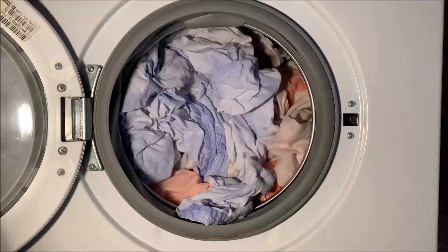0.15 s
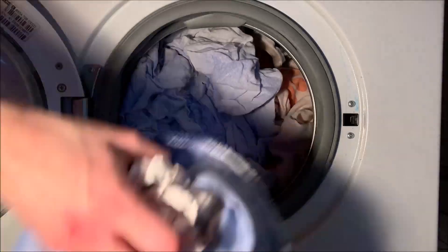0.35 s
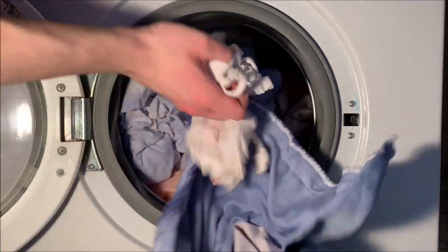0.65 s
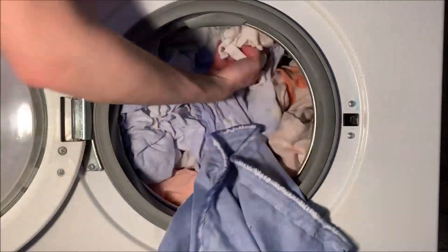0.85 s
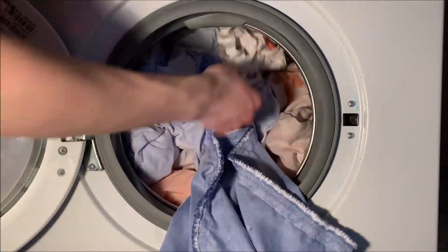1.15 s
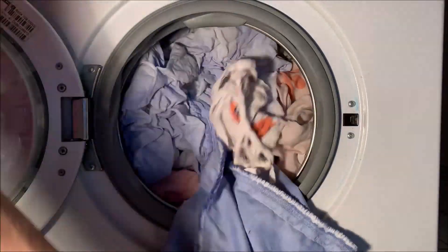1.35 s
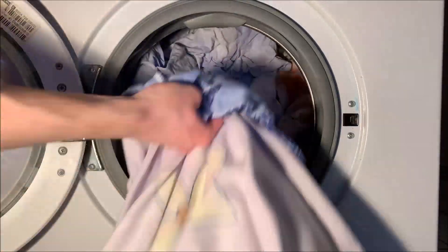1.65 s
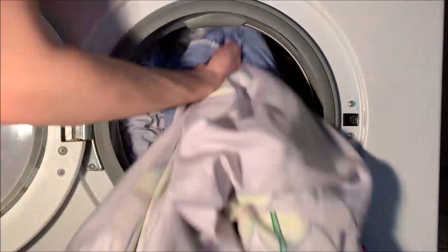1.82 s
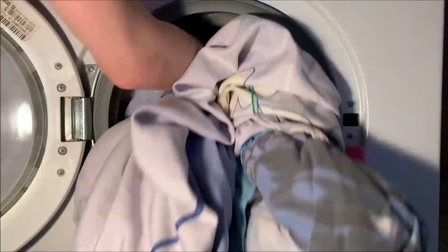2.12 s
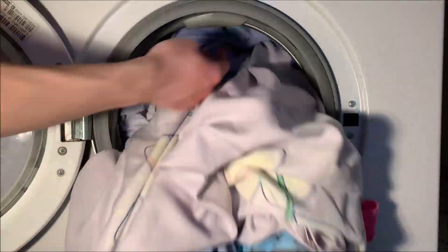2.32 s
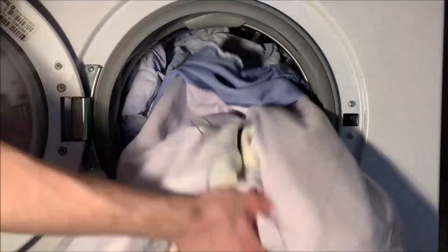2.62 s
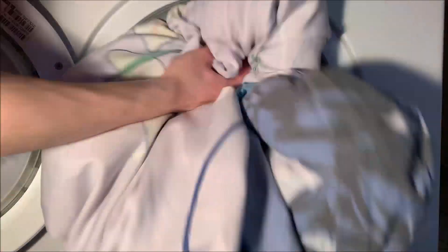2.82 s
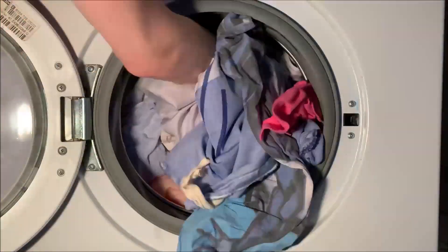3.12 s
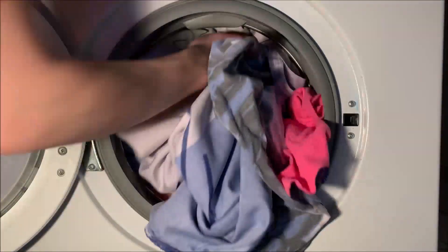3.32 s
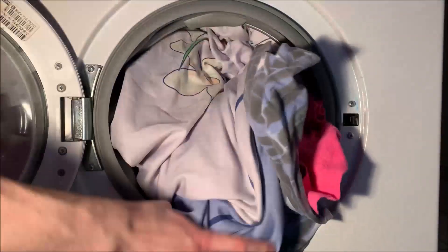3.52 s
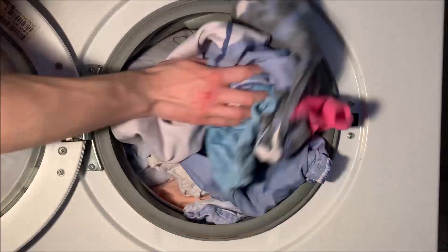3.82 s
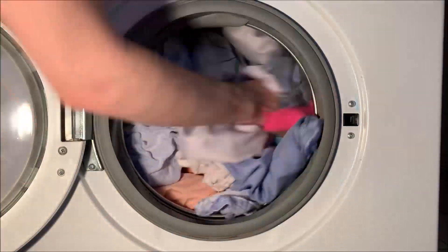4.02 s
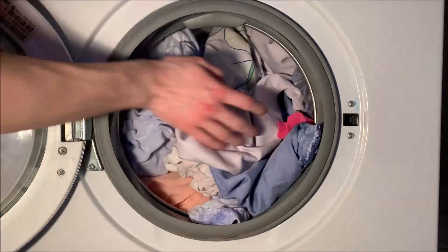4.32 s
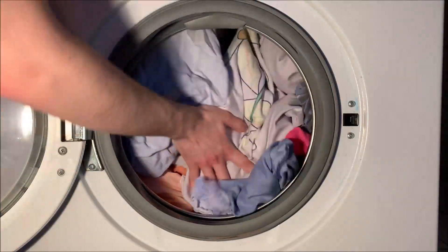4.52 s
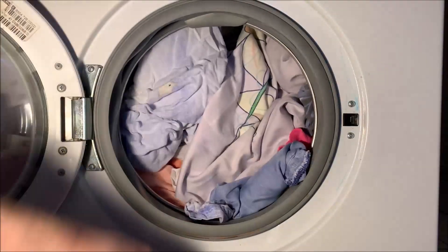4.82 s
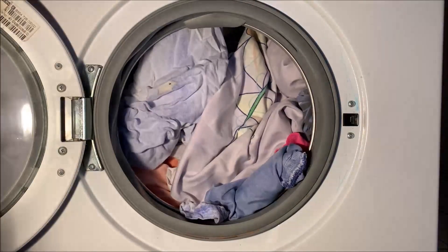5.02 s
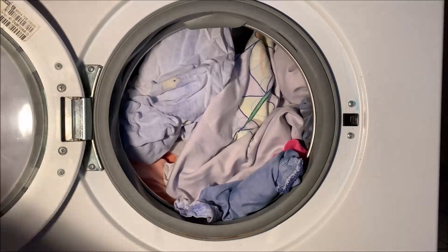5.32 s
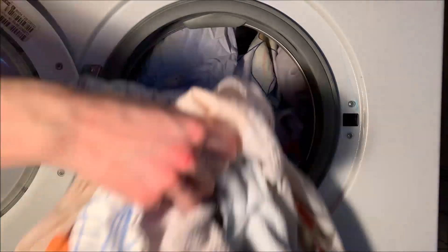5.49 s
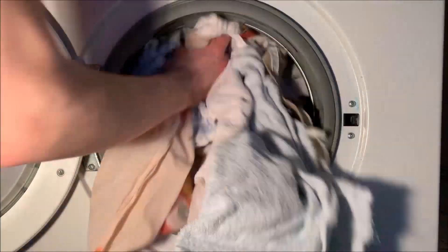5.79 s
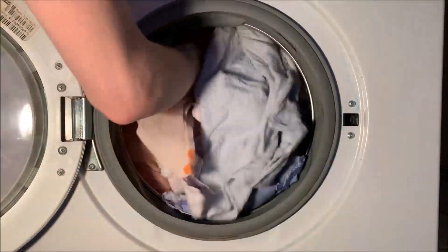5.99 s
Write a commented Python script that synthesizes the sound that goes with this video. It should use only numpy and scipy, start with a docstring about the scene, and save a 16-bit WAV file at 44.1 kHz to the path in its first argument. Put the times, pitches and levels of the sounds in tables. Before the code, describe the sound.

A close stereo perspective just before the open door of a washing machine, in a small hard room with a faint low background. From 0 to 1 s, light cloth swishes come in short strokes, with a soft thud near 0.3 and a low double bump near 0.8. After a brief lull, bumps at 1.4 to 1.5 lead into stronger rustling, dull rubbing on the seal and drum rumble around 1.6 to 2. At about 2.34 a hard, loud knock strikes the metal, with a quick clatter and short hollow ring. Dense rubbing and tumbling continue to 3.1, with thumps near 2.6 and 2.95. A pause, then low bumps and ticks at 3.65 to 3.75 and rustling to 4. Sparse, gentle strokes and faint taps follow until 5.6. A vigorous rubbing shove with deep thumps and a crisp tick closes at 5.8 to 6.

```python
"""Loading a washing machine

Armfuls of laundry are pushed into a front-loading washing machine, heard from just before its door.
Cloth slides over cloth and the door seal: coloured noise of tiny slips, swelling with each hand stroke.
The load bumps the hollow drum and something hard knocks it: decaying modes; noise resonances rumble below.
Taut cloth judders and buttons tick: short filtered bursts. A small room answers all but the cloth and rumble."""
import sys
import numpy as np
from scipy import signal
from scipy.fft import rfft, irfft
from scipy.io import wavfile
from scipy.ndimage import uniform_filter1d

SR = 44100
rng = np.random.default_rng(int(sys.argv[2]) if len(sys.argv) > 2 else 0)


def unload_wav(signal):
    """Save mono or channel-first audio to the path in sys.argv[1] as 16-bit WAV at rate SR, clipped to [-1, 1]."""
    wavfile.write(
        sys.argv[1],
        SR,
        np.round(np.clip(np.atleast_2d(signal).T, -1, 1) * 32767).astype(np.int16),
    )


N = 271215   # length in samples
T = np.arange(N) / SR   # seconds
HZ = np.maximum(np.fft.rfftfreq(2 * N, 1 / SR), 1)   # bins of a double-length spectrum


def from_db(db):
    """Decibels to gain."""
    return 10 ** (np.asarray(db) / 20)


def rms_one(x):
    """Scale to unit rms."""
    return x / np.sqrt(np.mean(x ** 2) + 1e-20)


def at_hz(points, hz):
    """Read a table on a log-frequency axis."""
    f, value = np.transpose(points)
    return np.interp(np.log(hz), np.log(f), value)


def drift(rate):
    """Random curve of rms 1: `rate` chance values a second joined by straight lines."""
    knots = rng.standard_normal(4096)
    return rms_one(np.interp(T * rate, np.arange(len(knots)), knots))


def band(x, hz, octaves):
    """Causal band-pass around hz."""
    edges = np.clip([hz / 2 ** (octaves / 2), hz * 2 ** (octaves / 2)], 10, .48 * SR)
    return signal.sosfilt(signal.butter(2, edges, "band", fs=SR, output="sos"), x)


# likeness of left and right in the sound field: pitch_hz [Hz], correlation [-1 to 1]
LIKENESS = [(60, .975), (130, .93), (300, .85), (640, .45), (1400, .3), (2500, -.25), (6000, -.1)]


def spread(pair, hz):
    """Two unrelated signals become left and right, as alike as the sound field is at hz."""
    alike = np.clip(at_hz(LIKENESS, hz), -.99, .99)
    middle = np.sqrt((1 + alike) / 2) * pair[0]
    side = np.sqrt((1 - alike) / 2) * pair[1]
    return middle + side * [[1], [-1]]


def half_octaves(draws):
    """Stereo half-octave bands (Hz, signal); neighbours come from different draws."""
    centres = 32 * 2 ** np.arange(0, 9.1, .5)
    return [(hz, spread(band(draws[k % 2], hz, 0.46), hz)) for k, hz in enumerate(centres)]


def coloured(draws, colour, patchy_db):
    """Give an excitation a spectrum whose bands flicker a little; rms 1."""
    patchy = sum(x * from_db(patchy_db * drift(35)) for hz, x in half_octaves(draws))
    spectrum = rfft(patchy, 2 * N) * from_db(at_hz(colour, HZ))
    return rms_one(irfft(spectrum)[:, :N])


def slips(per_s, size_db):
    """Tiny stick-slip releases at random moments and of uneven size, in two pairs of draws."""
    born = rng.random(N) < per_s / SR
    sizes = from_db(size_db * np.minimum(rng.exponential(1, N), 5))
    return rms_one(born * sizes * rng.standard_normal((2, 2, N))) + 1e-18


def add(out, s, sound):
    """Mix a short sound in at time s."""
    i = round(s * SR)
    out[:, i:i + sound.shape[1]] += sound[:, :N - i]


def swells(starts, holds, levels_db, rise_db_per_s, fall_db_per_s):
    """Gain of a run of movements that each rise, hold and fall away; the strongest leads."""
    t = T[::40, None]
    early = np.maximum(starts - t, 0)
    late = np.maximum(t - starts - holds, 0)
    db = np.max(levels_db - rise_db_per_s * early - fall_db_per_s * late, axis=1)
    return from_db(np.interp(T, t[:, 0], db))


def cavity(x, echo_db, longest_s, count=10):
    """Early echoes off the drum wall and the glass door comb the sound finely."""
    lags = (rng.uniform(.1, 1, (2, count)) * longest_s * SR).astype(int)
    echoes = np.zeros_like(x)
    for side in range(2):
        for k, lag in enumerate(lags[side]):
            echoes[side] += (-1) ** k * np.roll(x[side], lag)
    return rms_one(x + from_db(echo_db) * echoes)


# quiet of the room, relative spectrum: pitch_hz [Hz], density_db [dB per Hz]
FLOOR_COLOUR = [(25, -12), (65, 4.5), (150, -5), (300, -10), (700, -17), (1300, -15.5), (2000, -28.5),
                (5000, -33), (16000, -31.5)]


def room_floor():
    """Steady coloured noise stands for the quiet of the room."""
    return from_db(-67.5) * coloured(rng.standard_normal((2, 2, N)), FLOOR_COLOUR, patchy_db=1.1)


STROKE_RISE_DB_PER_S, STROKE_FALL_DB_PER_S = 237.5, 130
# hand strokes dragging cloth along, levels before the trims of each layer: start_s [s], hold_s [s],
# swish_db [dB], sheen_db of the finest fibres [dB against the swish], rub_db on seal and drum [dB]
STROKES = [(0.014, 0.15, -72, -3.5, -61.5), (0.264, 0.17, -67.5, -6.5, -62.5), (0.5, 0.055, -60, -1, -60.5),
           (0.624, 0.088, -62, -2, -58.5), (0.764, 0.068, -61, -5.5, -58), (0.955, 0.04, -74, 2, -69.5),
           (1.398, 0.22, -65.5, -5.5, -57.5), (1.603, 0.04, -59.5, -8, -50.5),
           (1.673, 0.14, -64.5, -9, -56), (1.858, 0.049, -58, -3.5, -53.5),
           (1.982, 0.031, -59.5, -9, -51.5), (2.2, 0.07, -85, 5, -64), (2.32, 0.02, -65.5, -6, -55),
           (2.444, 0.076, -64.5, -2.5, -54.5), (2.543, 0.23, -62, -4, -52.5),
           (2.616, 0.043, -58, -5, -47.5), (2.824, 0.056, -67.5, -4, -56.5), (2.924, 0.06, -59, -7.5, -49),
           (3.052, 0.054, -62, -3, -53), (3.25, 0.14, -77.5, -0.5, -65), (3.438, 0.094, -59.5, 3, -61),
           (3.666, 0.083, -64, -1.5, -51.5), (3.788, 0.12, -65.5, -4, -59), (3.931, 0.12, -60.5, -6.5, -56),
           (4.242, 0.062, -68, -4.5, -68.5), (4.393, 0.048, -67.5, -2.5, -65.5),
           (4.525, 0.042, -68, 0, -62), (4.735, 0.037, -74, -1, -69), (5.093, 0.083, -78, 4, -65.5),
           (5.198, 0.16, -69.5, -7.5, -63.5), (5.399, 0.088, -68, -1, -60.5), (5.54, 0.17, -76.5, 0, -63),
           (5.773, 0.12, -62, -6, -54), (5.873, 0.071, -57, 0.5, -48.5)]


def strokes():
    """Strength of the swish, its sheen and the rub as each hand stroke gathers speed, holds and slows."""
    starts, holds, swish_db, sheen_db, rub_db = np.transpose(STROKES)
    return [swells(starts, holds, db, STROKE_RISE_DB_PER_S, STROKE_FALL_DB_PER_S)
            for db in (swish_db, swish_db + sheen_db, rub_db)]


# cloth on cloth, relative spectrum: pitch_hz [Hz], density_db [dB per Hz]
SWISH_COLOUR = [(700, -29), (1500, 1.5), (2600, 3), (3600, 0), (5500, -3), (7500, -2.5), (8800, 5),
                (10500, 1.5), (13500, 0), (16000, 2.5)]


def cloth_swish(swish, sheen, grip_db, creases):
    """Fibres catch and let go: dense tiny slips make a bright hiss, its top octave moving on its own."""
    snaps = slips(per_s=220, size_db=1.0)   # stiff threads snap past each other
    crackle = slips(per_s=12000, size_db=1.0) + from_db(-10.5) * snaps
    fibres = cavity(coloured(crackle, SWISH_COLOUR, patchy_db=1.67), echo_db=-11.5, longest_s=0.013)
    fine = signal.sosfiltfilt(signal.butter(4, 8000, "high", fs=SR, output="sos"), fibres)
    body = swish * rms_one(fibres - fine) * from_db(0.5)
    top = sheen * rms_one(fine) * from_db(1.0 + 1.2 * drift(12))
    return (body + top) * from_db(grip_db + 0.35 * creases)


# cloth on the door seal, relative spectrum: pitch_hz [Hz], density_db [dB per Hz]
RUB_COLOUR = [(200, -17), (400, -3.5), (560, 0), (700, -5), (820, -3.5), (1050, -5.5), (1300, -6),
              (1580, -10.5), (1850, -21.5), (3500, -23), (7000, -34.5)]


def seal_rub(rub, grip_db, creases):
    """Coarser, sparser slips of cloth on the seal make a duller friction."""
    snags = from_db(-11) * slips(per_s=170, size_db=2.5)   # seams and folds let go one by one
    friction = slips(per_s=6000, size_db=3.0) + snags
    seal = cavity(coloured(friction, RUB_COLOUR, patchy_db=2.47), echo_db=-17.5, longest_s=.025)
    return rub * seal * from_db(2.0 + grip_db + 1.1 * creases)


SHOVE_RISE_DB_PER_S, SHOVE_FALL_DB_PER_S = 402.5, 131
SWAY_FROM_RUB_DB, FOLDS_FROM_RUB_DB = -0.5, 5   # any rubbing stirs the load: levels against the rub
# shoves that pack the load in, levels before the rumble trims:
# start_s [s], hold_s [s], sway_db of the drum [dB], folds_db of the tumbling cloth [dB]
SHOVES = [(0.328, 0.011, -46, -56.5), (0.66, 0.064, -43.5, -63), (0.781, 0.045, -40, -45),
          (1.452, 0.02, -52, -43.5), (1.6, 0.13, -49.5, -49), (1.866, 0.071, -42, -44),
          (2.07, 0.015, -41.5, -45), (2.312, 0.025, -35.5, -41.5), (2.569, 0.03, -36, -42.5),
          (2.627, 0.0089, -34.5, -34.5), (2.817, 0.043, -38.5, -42.5), (2.956, 0.034, -38, -31),
          (3.044, 0.047, -47, -37.5), (3.293, 0.31, -51.5, -61), (3.497, 0.039, -47, -48),
          (3.658, 0.12, -34.5, -38.5), (3.88, 0.037, -40.5, -47.5), (3.99, 0.12, -40, -46.5),
          (4.432, 0.019, -49, -56), (4.538, 0.073, -42, -50.5), (4.701, 0.095, -55.5, -56.5),
          (4.935, 0.029, -60.5, -47), (5.44, 0.11, -55.5, -53.5), (5.64, 0.16, -54, -48.5),
          (5.816, 0.017, -33.5, -40), (5.903, 0.051, -28.5, -35)]


def shoves(rub):
    """Strength of the drum's sway and of the tumbling folds: the shoves, and a share of all rubbing."""
    starts, holds, sway_db, folds_db = np.transpose(SHOVES)
    return [np.hypot(swells(starts, holds, db, SHOVE_RISE_DB_PER_S, SHOVE_FALL_DB_PER_S),
                     rub * from_db(share_db))
            for db, share_db in ((sway_db, SWAY_FROM_RUB_DB), (folds_db, FOLDS_FROM_RUB_DB))]


def stirred(modes, evenness):
    """Soft irregular pushes keep low resonances sounding; rms 1, partly levelled by evenness (0 to 1)."""
    out = 0
    for hz, width_hz, db in modes:
        b, a = signal.iirpeak(hz, hz / width_hz, SR)
        pushes = band(rng.standard_normal((2, N)), hz, 1.7)
        out = out + from_db(db) * spread(signal.lfilter(b, a, pushes), hz)
    power = uniform_filter1d(np.mean(out ** 2, axis=0), size=2600)
    return rms_one(out / (power + 1e-12) ** (evenness / 2))


# drum resonances stirred by the soft load: pitch_hz [Hz], width_hz [Hz], level_db [dB, relative]
SWAY_MODES = [(53, 26, -15), (74.5, 6.7, -0.5)]
# resonances stirred by the tumbling folds: pitch_hz [Hz], width_hz [Hz], level_db [dB, relative]
FOLD_MODES = [(122, 140, -1.5), (149, 18, 3.5), (215.5, 110, -10.5), (317, 62, -8.5), (378.7, 25, -11.5)]


def load_rumble(sway, folds):
    """Noise-driven low resonances: the drum sways under the load and the folds tumble."""
    drum = sway * from_db(-2.5) * stirred(SWAY_MODES, evenness=0.79)
    tumble = folds * from_db(-2.0) * stirred(FOLD_MODES, evenness=0.5)
    return drum + tumble


def cloth():
    """Swish, rub and rumble follow the same hands; both frictions share one grip and one flutter."""
    swish, sheen, rub = strokes()
    sway, folds = shoves(rub)
    grip_db = 0.29 * drift(22)   # the grip of the hand is never quite even
    creases = drift(70)   # creases pass under the hand and make both frictions flutter
    frictions = cloth_swish(swish, sheen, grip_db, creases) + seal_rub(rub, grip_db, creases)
    return frictions + load_rumble(sway, folds)


# modes of drum and cabinet: pitch_hz [Hz], level_db [dB, relative], t60_s [s]
DRUM = [(69.6, 6, 0.26), (82.5, -19, 0.9), (107.4, -6.5, 0.36), (153.6, -2, 0.27), (172.1, -11.5, 0.37),
        (225, -11.5, 0.19), (273, -11.5, 0.074), (321.5, 0, 0.15), (381.1, -3, .22), (401.5, -9, 0.11),
        (491, -7, 0.11), (549.5, -14, 0.11), (594, -10.5, .14), (658.3, -17.5, 0.061), (746, -12.5, 0.14),
        (822, -15, 0.079), (900.5, -16.5, 0.27), (1033, -27.5, 0.21), (1130, -15.5, 0.13),
        (1177, -21.5, 0.14), (1210, -25, .2), (1420, -31.5, 0.091), (1550, -32, 0.13), (1695, -33, 0.13),
        (2250, -28.5, 0.25), (3004, -28.5, 0.21)]
# blows on the drum: start_s [s], level_db [dB, before mode levels],
# centre_hz of the modes reached [Hz], spread_octaves [octaves, standard deviation]
BLOWS = [(0.316, -35.5, 193, 0.24), (0.787, -29.5, 259, 0.17), (0.801, -28, 75, 0.43),
         (1.427, -26.5, 187, 0.16), (1.508, -29, 200, 0.18), (1.623, -37.5, 167, 0.23),
         (1.888, -31, 326, 0.15), (1.927, -31.5, 70, 0.54), (2.325, -28.5, 850, 0.91),
         (2.338, -13.5, 860, 1.23), (2.3443, -8.5, 300, 0.38), (2.3573, -16.5, 323.7, 0.34),
         (2.361, -18, 72, .6), (2.372, -18.5, 990, 0.61), (2.553, -38.5, 199, 1.5),
         (2.612, -37.5, 885, 1.46), (2.632, -33, 79.5, 0.54), (2.936, -37, 307, 1.2),
         (2.974, -28.5, 473, 0.75), (2.981, -27, 94, 1), (3.054, -28, 73, 0.39), (3.637, -24, 149, 0.5),
         (3.687, -21.5, 152, 0.12), (3.745, -41, 500, 0.4), (3.970, -42, 695, 0.97),
         (3.982, -33, 111.5, 0.66), (4.05, -35, 98, 1.4), (4.779, -41.5, 367, 0.13),
         (4.919, -43.5, 600, 0.34), (4.946, -38.5, 137.5, 0.49), (5.427, -35.5, 151, 0.16),
         (5.572, -44.5, 620, 0.62), (5.815, -28.5, 486, 0.61), (5.890, -32, 353, 1.6),
         (5.89, -27, 85, 0.34)]


def blows():
    """Soft bundles reach only the low modes of the drum, a hard knock the high ones as well."""
    out, t = np.zeros((2, N)), T[:SR // 2]
    hz, mode_db, t60 = np.transpose(DRUM)
    signs = (-1) ** np.arange(len(hz))   # neighbouring modes swing against each other
    # each mode meets the two microphone ports at a different phase
    port_phase = np.arccos(np.clip(at_hz(LIKENESS, hz), -1, 1)) * signs * .3
    phase = 2 * np.pi * hz[:, None] * t + np.array([port_phase, -port_phase])[:, :, None]
    onset = 1 - np.exp(-t * hz[:, None] * 4.3)
    rings = np.sin(phase) * from_db(-60 * t / t60[:, None]) * onset
    for s, db, centre_hz, octaves in BLOWS:
        reached = np.exp(-.5 * (np.log2(hz / centre_hz) / octaves) ** 2)
        uneven_db = rng.normal(0, 0.94, len(hz))
        add(out, s, (signs * reached * from_db(db + mode_db + uneven_db)) @ rings)
    return out


# cloth drawn tight over the door seal or the drum wall:
# start_s [s], length_s [s], level_db [dB, before the swell], centre_hz [Hz], width_octaves [octaves]
DRAGS = [(0.43, 0.052, -63, 1380, 0.72), (0.458, 0.12, -59.5, 1480, 0.61), (0.712, 0.14, -56, 1510, 0.65),
         (1.964, 0.18, -52.5, 944, 0.68), (2.942, 0.092, -50, 790, 0.25), (3.718, 0.079, -46, 487, 0.46),
         (5.165, 0.0734, -60, 540, 1.8), (5.782, 0.081, -42.5, 517, 1.35), (5.907, 0.14, -48, 378, 0.25)]


def drags():
    """Taut cloth judders over an edge: quick slips in one resonance, swelling and dying with the pull."""
    out = np.zeros((2, N))
    judder = slips(per_s=900, size_db=-0.5)[0]
    for s, length_s, db, hz, octaves in DRAGS:
        i, n = round(s * SR), round(length_s * SR)
        pull = rms_one(spread(band(judder[:, i:i + n], hz, octaves), hz))
        add(out, s, from_db(db) * np.hanning(n) * pull)
    return out


# buttons, fasteners and other brief contacts: start_s [s], level_db [dB, before the fade's rms],
# centre_hz [Hz], width_octaves [octaves], t60_s [s]
TICKS = [(1.355, -55.5, 1000, 3.3, 0.023), (1.972, -51.5, 8000, 1.6, 0.046),
         (2.314, -40.5, 970, 0.43, 0.064), (2.320, -54, 4500, 0.39, 0.13),
         (2.329, -31.5, 1050, 0.91, 0.019), (2.338, -35.5, 1380, 0.87, 0.14), (2.337, -47, 4020, 1.1, 0.13),
         (2.341, -42.5, 7240, 0.23, 0.055), (2.340, -57.5, 11500, 1.0, 0.025),
         (2.456, -55, 11900, 1.1, 0.074), (2.61, -32, 1360, 0.52, 0.044), (2.613, -48, 2800, 0.33, .06),
         (2.912, -42, 1350, 0.9, 0.013), (2.976, -31.5, 680, 0.58, 0.026), (3.65, -40.5, 1640, 0.57, 0.026),
         (3.672, -44, 1500, 0.98, 0.034), (3.721, -47, 1500, 2, 0.034), (3.747, -43, 750, 1.8, 0.049),
         (3.971, -47, 815, 0.75, 0.027), (4.046, -51.5, 2640, 0.14, 0.066), (4.921, -54, 652, 0.8, 0.057),
         (5.0415, -52, 613, 0.8, 0.04), (5.447, -55, 1500, 0.58, 0.05), (5.572, -54, 1500, 1.4, 0.059),
         (5.673, -42.5, 10400, 0.62, 0.0082), (5.675, -55, 4500, 2.1, 0.027),
         (5.891, -36, 690, 0.81, 0.028), (5.911, -46.5, 4800, 0.76, 0.057),
         (5.932, -31.5, 9700, 0.94, 0.0098)]


def ticks():
    """A small hard contact sets many close, quickly damped modes going, drawn as fading band noise."""
    out, t = np.zeros((2, N)), T[:SR // 5]
    for s, db, hz, octaves, t60 in TICKS:
        fade = from_db(-60 * t / t60)
        burst = spread(band(rng.standard_normal((2, len(t))) * fade, hz, octaves), hz)
        add(out, s, from_db(db) * rms_one(burst) * np.sqrt(np.mean(fade ** 2)))
    return out


KNOCK_S = 2.3353
BENDING_LAG_CYCLES = 2.3   # slow bending waves bring the low modes in last
# drum wall at the point of the hard knock: pitch_hz [Hz], level_db [dB], t60_s [s]
WALL_MODES = [(1540, -25.5, 0.016), (722, -1, 0.02), (632, -14.5, 0.097), (518, -11, 0.046),
              (406, -12.5, 0.11), (295.5, -5.5, 0.062)]


def knock():
    """Something hard hits the drum; the wall right at the contact rings briefly."""
    out, t = np.zeros((2, N)), T[:SR // 5]
    for hz, db, t60 in WALL_MODES:
        onset = 1 - np.exp(-2 * hz * t)
        ring = np.sin(2 * np.pi * hz * t) * onset * from_db(db - 60 * t / t60)
        add(out, KNOCK_S + BENDING_LAG_CYCLES / hz, ring[None])
    return out


# decay of the room: pitch_hz [Hz], t60_s [s]
ROOM_T60 = [(70, 0.17), (300, .48), (1000, .45), (3000, .35), (12000, 0.27)]


def room(x, build_s):
    """Diffuse reflections of a small hard room: decaying noise bands, the middle lasting longest."""
    t = T[:SR * 3 // 4]
    bands = half_octaves(rng.standard_normal((2, 2, len(t))))
    tail = sum(noise * from_db(-60 * t / at_hz(ROOM_T60, hz)) for hz, noise in bands)
    tail = tail * (1 - np.exp(-(t / build_s) ** 2)) / np.sqrt(SR / 30)
    return signal.fftconvolve(x, tail, axes=1)[:, :N]


def scene():
    """Cloth, blows, drags, ticks and knock over the quiet of the room, which answers the hits."""
    floor = room_floor()
    laundry = cloth()
    hits = blows() + drags() + ticks() + knock()
    return laundry + hits + from_db(-7) * room(hits, build_s=0.012) + floor


MIC_LOW_CUT_HZ, CUTOFF_HZ = 44, 15750
PORT_LAG_S = .00014   # delay of the right side
# stereo balance: pitch_hz [Hz], left_minus_right_db [dB]
BALANCE = [(70, .4), (330, 1.3), (600, 5.5), (1200, 5), (1900, 0), (2600, 1), (5200, -2), (7000, 0)]


def record(dry):
    """The microphone sheds deep bass and leans left; its treble is one signal, phase-turned at right."""
    dry = signal.sosfilt(signal.butter(3, MIC_LOW_CUT_HZ, "high", fs=SR, output="sos"), dry)
    left, right = rfft(dry, 2 * N) * from_db(at_hz(BALANCE, HZ) * [[.5], [-.5]])
    right = right * np.exp(-2j * np.pi * HZ * PORT_LAG_S)
    shared = np.clip((HZ - 5800) / 2200, 0, 1)   # from 8 kHz up the right is all left signal
    turn = np.exp(2j * np.pi * (HZ - 6150) / 4850)
    right = np.sqrt(1 - shared) * right + np.sqrt(shared) * turn * left
    top_cut = 1 / np.sqrt(1 + (HZ / CUTOFF_HZ) ** 200)
    return irfft(np.array([left, right]) * top_cut)[:, :N]


dry = scene()
out = record(dry)
unload_wav(out)
```